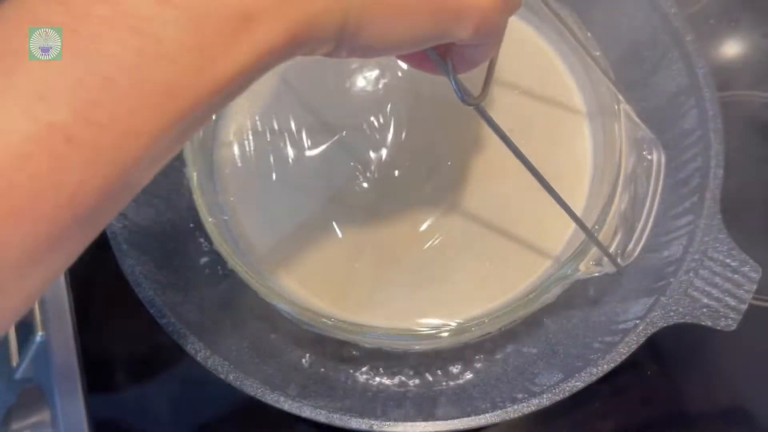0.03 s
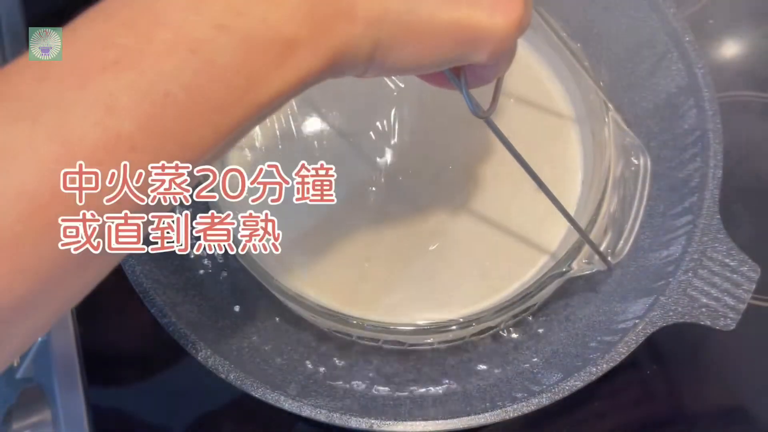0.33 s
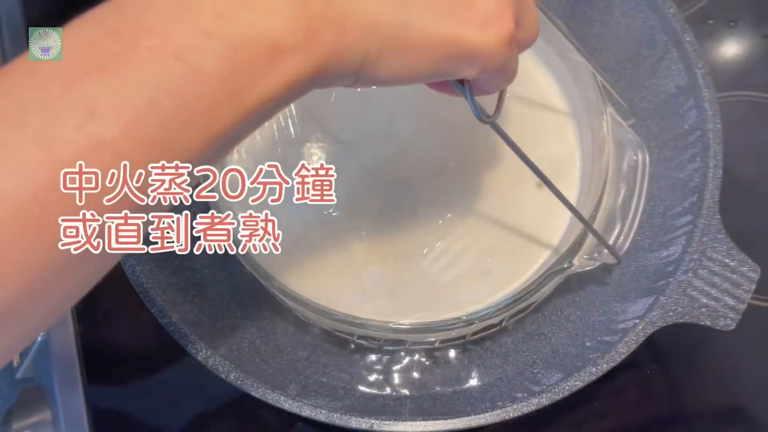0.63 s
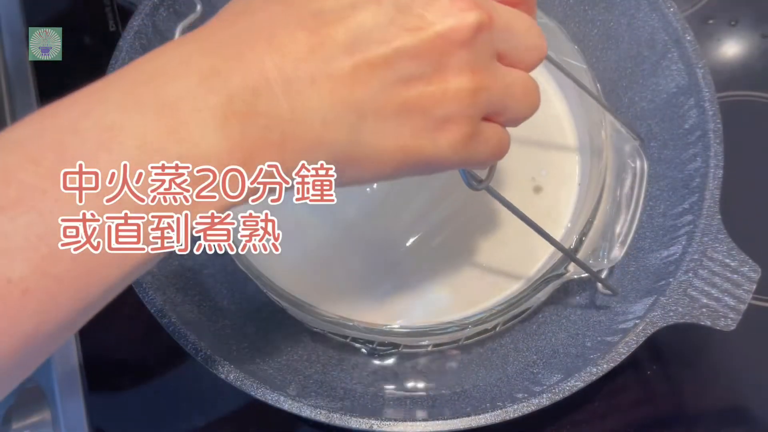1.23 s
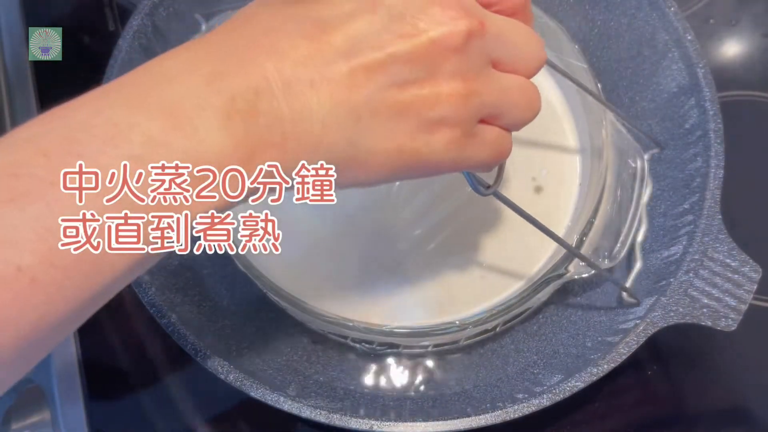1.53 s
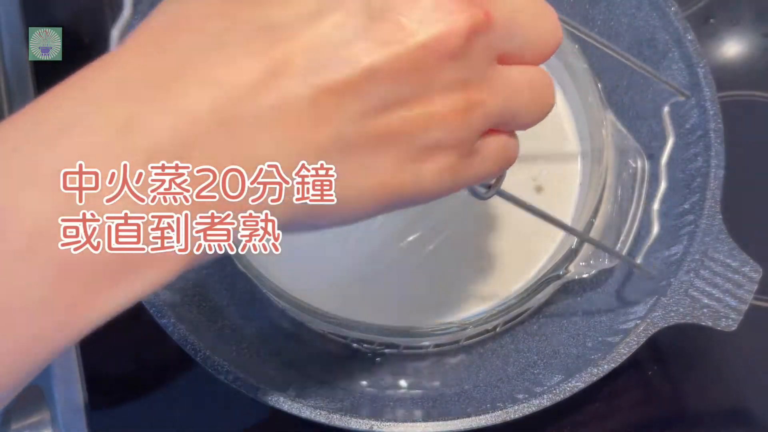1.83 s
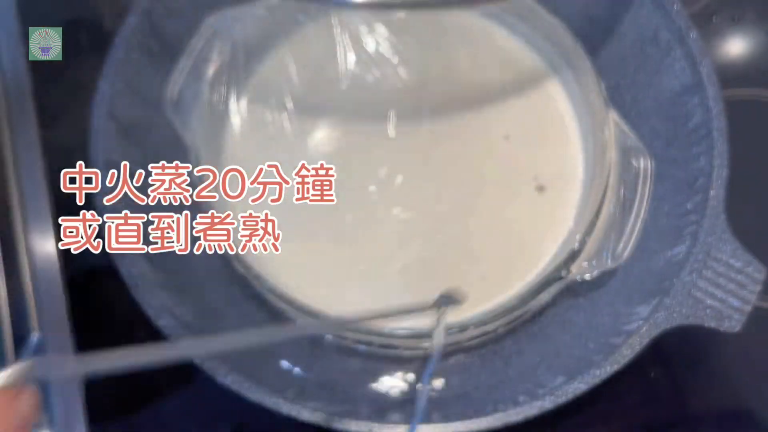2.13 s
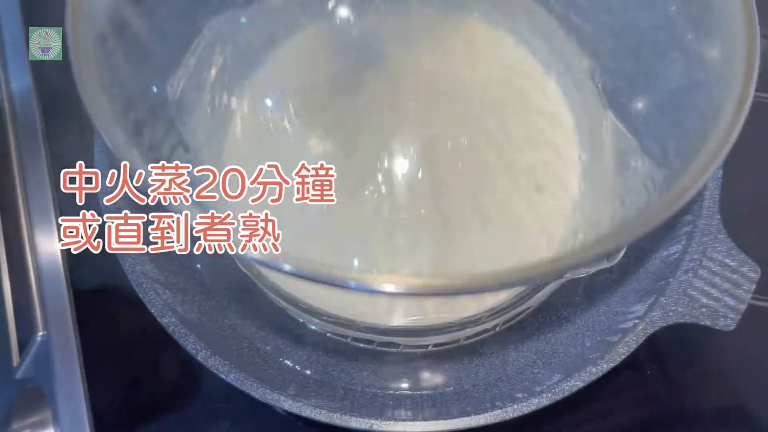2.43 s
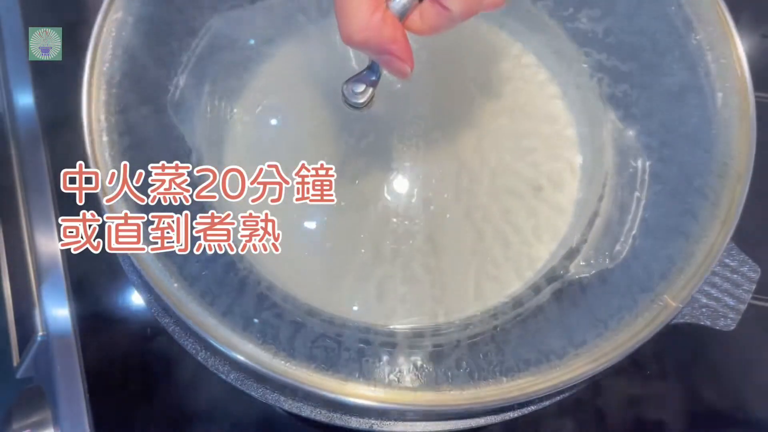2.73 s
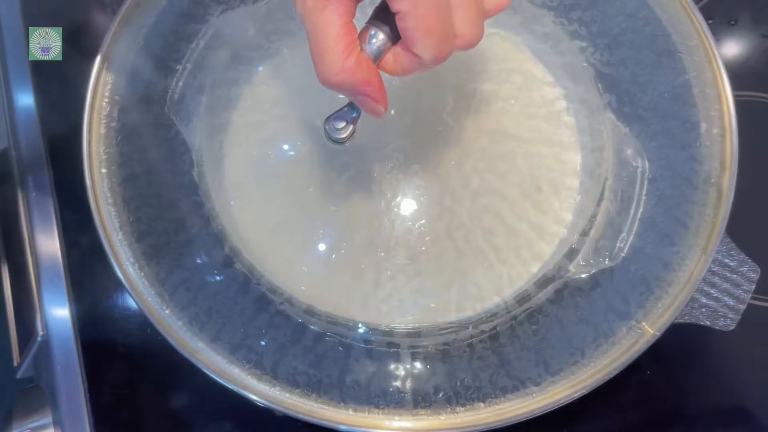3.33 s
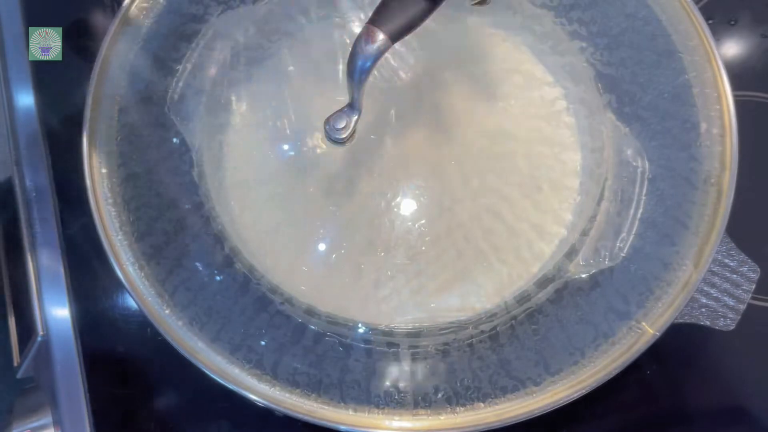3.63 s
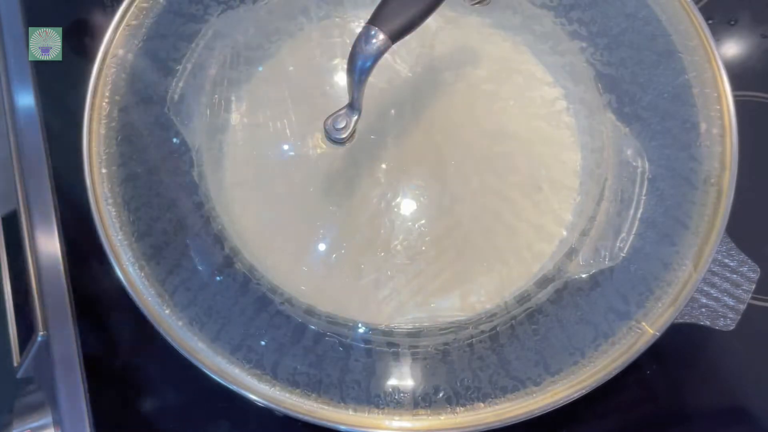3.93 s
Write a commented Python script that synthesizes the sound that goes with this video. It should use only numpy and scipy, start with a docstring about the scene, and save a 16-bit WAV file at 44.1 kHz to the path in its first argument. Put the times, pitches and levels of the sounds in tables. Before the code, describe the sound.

Cookware clatters close to the microphone in a kitchen: metal tongs tap a glass bowl and a pot, a glass lid lands and settles with hollow knocks, then its handle clicks sharply. A fan hums steadily throughout.

```python
"""Steel tongs clink and scrape on a glass bowl as they let go of it in a pot, then knock the pot's wall.
A glass lid clacks onto the rim, rocks over the hollow pot and thumps into its seat; its handle falls
with a click. Each hard hit is a burst of chatter plus ringing modes, with a little kitchen reverb.
A fan hums throughout. The close microphone pair shifts the treble in phase."""
import sys
import numpy as np
from scipy import signal
from scipy.fft import rfft, irfft, next_fast_len
from scipy.io import wavfile
from scipy.ndimage import uniform_filter1d, map_coordinates

SR = 44100
rng = np.random.default_rng(int(sys.argv[2]) if len(sys.argv) > 2 else 0)


def master(y):
    """Save y as 16-bit WAV."""
    cut = np.clip(np.atleast_2d(y).T, -1, 1)
    pcm = np.round(cut * 32767)  # scale
    wavfile.write(sys.argv[1], SR, pcm.astype(np.int16))


N = 176400

# tong hits on the bowl: (time [s], level [dB], body [dB], top [dB], ping [dB])
CLINKS = [(.192, -23, -4.5, 4.5, -14.5), (.221, -36, 10.5, -11, -14), (.247, -29, 2, -7, -13),
          (.559, -29, 1, -8, -5), (.590, -39, 0, 2, -12), (.701, -30, -5.5, -5.5, -3),
          (.749, -19.5, 2.5, 5.5, -14), (.762, -25, -16, 6.5, -15), (.869, -19, -13, -3, -16.5),
          (.985, -15, 3, 3.5, -4), (1.121, -35, -3, 3, -10), (1.165, -29, 8, -14, 3.5),
          (1.387, -36.5, -8, 1, -9), (1.409, -13.5, -12, -2.5, -15)]
# ring of bowl and tongs: (frequency [Hz], level [dB])
BOWL_MODES = [(1740, -5), (1980, -2.5), (2140, -0.5), (5960, -4), (6490, -2), (8235, -2), (9600, 1),
              (11250, -5.5)]
# EQ of the clink's attack: (frequency [Hz], gain [dB])
CLINK_EQ = [(300, -37), (1350, -10), (2050, 3), (2600, -6), (4700, -6), (6100, 0.5), (8500, 3.5),
            (11400, -2), (12500, -19), (14000, -55)]
def tongs():
    """Steel strikes the glass bowl, and the arms of the tongs ping with each hit."""
    ping_hz = 3064
    out = np.zeros((2, N))
    for s, db, body_db, top_db, ping_db in CLINKS:
        clink = blow(BOWL_MODES, CLINK_EQ, ring_db=-7, ring_t60=0.065, chatter_s=0.0054, t60=0.041,
                     body_db=body_db, top_db=top_db)
        add(out, s, amp(db) * clink)
        add(out, s, amp(db + ping_db) * ring([(ping_hz, 0)], t60=0.056))
    return out


# envelope of the slide: (time [s], level [dB])
SLIDE = [(.2, -33), (.26, -31.5), (.32, -35), (.35, -46)]
def scrape():
    """The tongs slide on the glass in small uneven catches, each a short rasp."""
    catches_per_s = 330
    slide_db = np.interp(np.arange(N) / SR, *np.transpose(SLIDE), left=-120, right=-120)
    catches = (rng.random(N) < catches_per_s / SR) * amp(slide_db + 2.6 * rng.standard_normal(N))
    rasp = blow(BOWL_MODES, CLINK_EQ, ring_db=-10, ring_t60=0.014, chatter_s=0, t60=0.023)
    return signal.fftconvolve(catches[None], rasp, axes=1)[:, :N]


# ring of the pot's wall: (frequency [Hz], level [dB])
POT_MODES = [(1102, -0.5), (1892, 1.5), (2705, -7), (4274, -4), (6019, -8), (7520, -7)]
# EQ of the knock's attack: (frequency [Hz], gain [dB])
POT_EQ = [(300, -15), (1900, 1.5), (4700, -1.5), (6200, 2.5), (10000, -2), (12000, -7.5), (13000, -45)]
def pot_knock():
    """The tongs knock the pot's wall on their way out."""
    out = np.zeros((2, N))
    knock = blow(POT_MODES, POT_EQ, ring_db=-7.5, ring_t60=0.12, chatter_s=0.0066, t60=0.05)
    add(out, s=1.555, sound=amp(-17.5) * knock)
    return out


# lid hits on the rim: (time [s], level [dB], body [dB], top [dB])
CLACKS = [(2.603, -17, -.5, 0), (2.666, -20, 0, 1), (3.239, -29.5, 1, 5), (3.277, -34.5, 0, 0)]
# ring of the glass lid: (frequency [Hz], level [dB])
LID_MODES = [(431, 1), (1012, -5), (2460, -2.5), (2880, -3), (4200, -7.5)]
# EQ of the clack's attack: (frequency [Hz], gain [dB])
LID_EQ = [(150, 8), (500, 9), (1200, 0), (3000, -3), (4800, -2.5), (7000, -0.5), (11500, -8), (13200, -45)]
# hollow notes of the pot: (time [s], pitch [Hz], level [dB])
HOLLOWS = [(2.606, 334, -17.5), (2.668, 385, -10), (2.757, 391, -17.5), (2.876, 326, -12.5),
           (2.890, 293, -10.5)]
def lid():
    """The lid clacks on the rim; as it rocks, the hollow pot sounds beneath it."""
    out = np.zeros((2, N))
    for s, db, body_db, top_db in CLACKS:
        clack = blow(LID_MODES, LID_EQ, ring_db=-5, ring_t60=0.071, chatter_s=0.0052, t60=0.042,
                     body_db=body_db, top_db=top_db)
        add(out, s, amp(db) * clack)
    for s, hz, db in HOLLOWS:
        add(out, s, amp(db) * ring([(hz, 0)], t60=0.076, rise_s=0.0025))
    return out


# dull knocks of the settling lid: (time [s], level [dB])
THUDS = [(3.130, -21.5), (3.247, -21.5), (3.272, -23.5), (3.291, -28.5)]
# low modes of lid and pot: (frequency [Hz], level [dB])
SEAT_MODES = [(105, 1.5), (250, -3.5), (367, -3), (590, -6.5)]
# EQ of the thud's attack: (frequency [Hz], gain [dB])
THUD_EQ = [(150, 2.5), (400, 3.5), (700, 2.5), (1100, -10), (5000, -24.5), (9000, -50)]
def lid_seat():
    """The lid thuds and drops home: one push starts all the low modes, and the lowest lasts longest."""
    out = np.zeros((2, N))
    for s, db in THUDS:
        thud = blow(SEAT_MODES, THUD_EQ, ring_db=-8, ring_t60=0.11, chatter_s=0.006, t60=0.093)
        add(out, s, amp(db) * thud)
    t = np.arange(SR // 2) / SR
    decay_cycles = 35
    thump = sum(amp(db - 60 * t * hz / decay_cycles) * np.sin(2 * np.pi * hz * t)
                for hz, db in SEAT_MODES)
    add(out, s=3.249, sound=amp(-17) * thump)
    return out


# bright ring of the handle: (frequency [Hz], level [dB])
HANDLE_MODES = [(2990, -4), (5300, -6), (6820, -1.5), (8230, 0), (9040, 7), (12310, -1.5)]
# EQ of the click's attack: (frequency [Hz], gain [dB])
HANDLE_EQ = [(1500, -49), (3000, 3.5), (3900, -26), (6000, 2), (9000, -5), (12000, 3), (13000, -9),
             (14500, -38)]
def handle():
    """The lid's handle is let go and clicks against its steel mount."""
    out = np.zeros((2, N))
    click = blow(HANDLE_MODES, HANDLE_EQ, ring_db=-6.5, ring_t60=0.1, chatter_s=0.0047, t60=0.061)
    add(out, s=3.9435, sound=amp(-12) * click)
    return out


# motor and blade tones: (frequency [Hz], level [dB])
FAN_TONES = [(59.2, -46), (130.7, -37.5), (164.5, -44.5), (174.6, -38), (293.7, -43.5)]
# EQ of the rushing air: (frequency [Hz], gain [dB])
AIR_EQ = [(22, -44), (52, -12.5), (115, 0.5), (185, -5.5), (215, -18), (270, -8), (750, -16.5),
          (1250, -24.5), (2500, -28), (5200, -37.5), (11200, -43), (12300, -64.5)]
def fan():
    """A slightly unsteady hum over a bed of rushing air; the bass leans to the right."""
    t = np.arange(N) / SR
    hum = np.zeros(N)
    for hz, db in FAN_TONES:
        peak = np.sqrt(2) * amp(db + 1.8 * wobble(4.98))
        hum += peak * np.sin(2 * np.pi * (hz * t + rng.random()) + 0.31 * wobble(2.97))
    air = amp(-30.5 + 0.73 * wobble(3.99)) * noise(AIR_EQ, N)
    pan = [(70, 0.79), (200, -2.36), (500, -0.24)]  # (frequency [Hz], leftward lean [dB])
    return filtered(air + hum, lambda hz: amp(np.outer([1, -1], along(pan, hz))))


# reverb decay: (frequency [Hz], t60 [s])
ROOM_DECAY = [(150, 0.35), (2000, 0.45), (9000, 0.3)]
def kitchen(x):
    """Short room reverb after a 5 ms pre-delay; each frequency dies at its own speed."""
    hz, t, spectrum = signal.stft(noise([(100, 0), (10000, 0)], SR // 2), SR, nperseg=256)
    tail = signal.istft(spectrum * amp(-60 * t / along(ROOM_DECAY, hz)[:, None]), SR, nperseg=256)[1]
    delayed = np.pad(x, ((0, 0), (SR // 200, 0)))
    return signal.fftconvolve(delayed, tail / np.linalg.norm(tail[0]), axes=1)[:, :N]


def blow(modes, eq, ring_db, ring_t60, chatter_s, t60, body_db=0, top_db=0):
    """A hard contact: brief chatter in dense, damped modes of uneven strength; clear modes ring on."""
    t = np.arange(SR // 2) / SR
    shelves = [(3000, body_db), (5500, 0), (8000, 0), (10500, top_db)]
    ripple_db, ripple_hz = 6, 170
    knots = rng.standard_normal(400)
    ripple = lambda hz: np.tanh(map_coordinates(knots, [hz / ripple_hz], mode="mirror")) - 1 / 3
    chatter = filtered(noise(eq, len(t)), lambda hz: amp(along(shelves, hz) + ripple_db * ripple(hz)))
    attack = (1 - np.exp(-t / 0.00022)) ** 2
    decay = amp(-60 * np.maximum(t - chatter_s, 0) / t60)
    tones = ring([(hz, db + along(shelves, hz)) for hz, db in modes], ring_t60, scatter_db=1.5, blur=10.5)
    return chatter * attack * decay + amp(ring_db) * tones


def ring(modes, t60, rise_s=0.00073, scatter_db=0, blur=0):
    """Decaying modes; scatter varies their strength, and blur smears their phase as a rattle does."""
    t = np.arange(SR // 2) / SR
    tones = np.zeros(len(t))
    for hz, db in modes:
        gain = amp(db + scatter_db * rng.normal())
        phase = 2 * np.pi * (hz * t + rng.random())
        drift = np.cumsum(uniform_filter1d(rng.standard_normal(len(t)), size=40)) / np.sqrt(SR)
        tones += gain * np.sin(phase + blur * drift)
    return tones * amp(-60 * t / t60) * (1 - np.exp(-t / rise_s)) ** 2


# stereo image of the noise: (frequency [Hz], left-right correlation [0..1])
CORRELATION = [(60, 0.92), (600, 0.44), (1100, 0.37), (3500, 0.39), (6000, 1)]
def noise(eq, size):
    """Shaped stereo noise of rms 1, partly alike in the two channels."""
    def mid_side_gains(hz):
        width = np.arccos(np.clip(along(CORRELATION, hz), -1, 1)) / 2
        return amp(along(eq, hz)) * [np.cos(width), np.sin(width)]
    mid, side = filtered(rng.standard_normal((2, size)), mid_side_gains)
    stereo = np.array([mid + side, mid - side])
    return stereo / np.sqrt(np.mean(stereo ** 2) + 1e-20)


def amp(db):
    """Decibels to gain."""
    return 10 ** (np.asarray(db) / 20)


def along(points, hz):
    """Read a curve of (frequency [Hz], value) points on a log axis."""
    freqs, values = np.transpose(points)
    return np.interp(np.log(hz + 1), np.log(freqs + 1), values)


def wobble(rate):
    """A smooth random curve, rate knots a second."""
    return map_coordinates(rng.standard_normal(int(N * rate / SR) + 4), [np.arange(N) * rate / SR])


def filtered(x, response):
    """Filter x by a complex response of frequency."""
    n = x.shape[-1]
    padded = next_fast_len(n + SR // 8)
    return irfft(rfft(x, padded) * response(np.fft.rfftfreq(padded, 1 / SR)), padded)[..., :n]


def add(track, s, sound):
    """Mix a sound into the track at s seconds."""
    part = track[:, round(s * SR):][:, :sound.shape[-1]]
    part += sound[..., :part.shape[1]]


def scene():
    """Tongs, lid and handle, each with its own reverb send, over the fan."""
    clinks = tongs() + pot_knock() + scrape()
    clacks = lid() + lid_seat()
    click = handle()
    send = amp(-15) * clinks + amp(-14) * clacks + amp(-9) * click
    return clinks + clacks + click + kitchen(send) + fan()


# phase between the microphones: (frequency [Hz], left lead [turns])
MIC_PHASE = [(3600, 0), (4800, .5), (5800, 1), (9050, 1.5), (11900, 2)]
def record(dry):
    """The left channel leads by a phase that grows through the treble; a steep high cut follows."""
    high_cut_hz = 14200
    lead = lambda hz: np.exp(1j * np.pi * np.outer([1, -1], np.interp(hz, *np.transpose(MIC_PHASE))))
    return filtered(dry, lambda hz: lead(hz) * (hz < high_cut_hz))


dry = scene()
out = record(dry)
master(out)
```